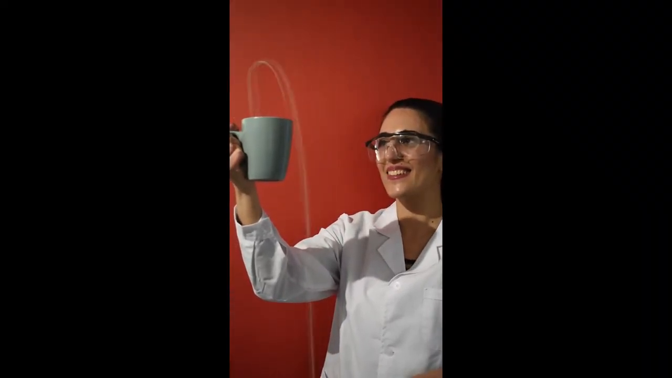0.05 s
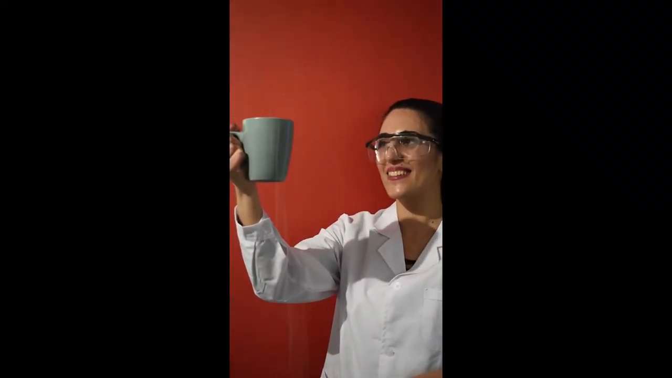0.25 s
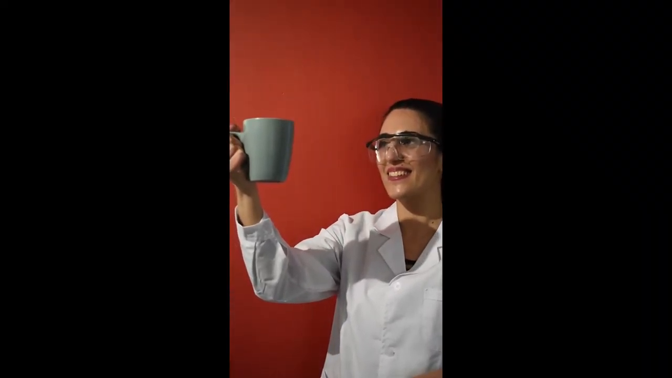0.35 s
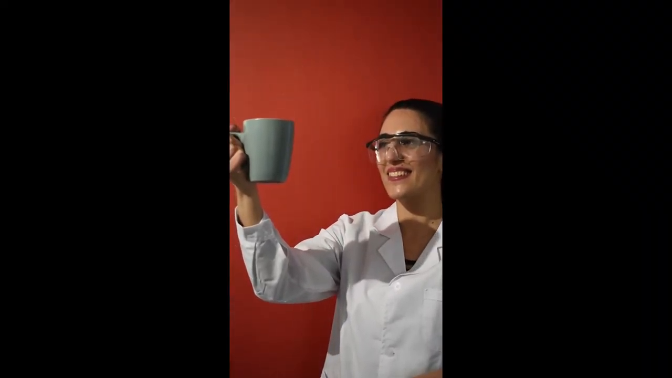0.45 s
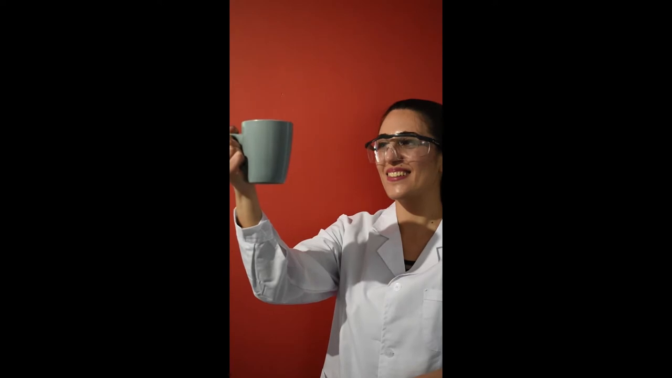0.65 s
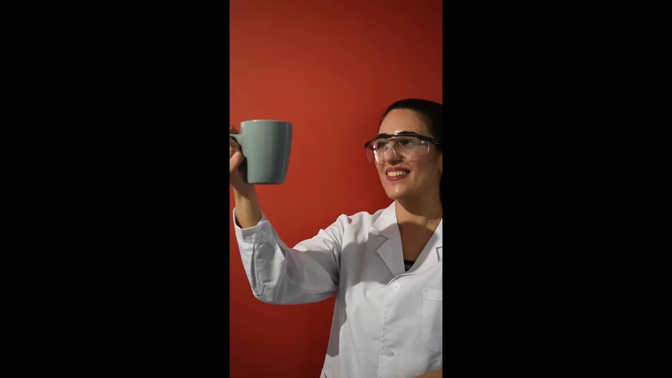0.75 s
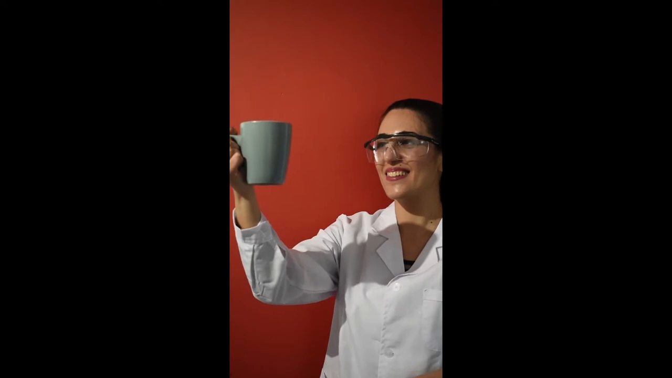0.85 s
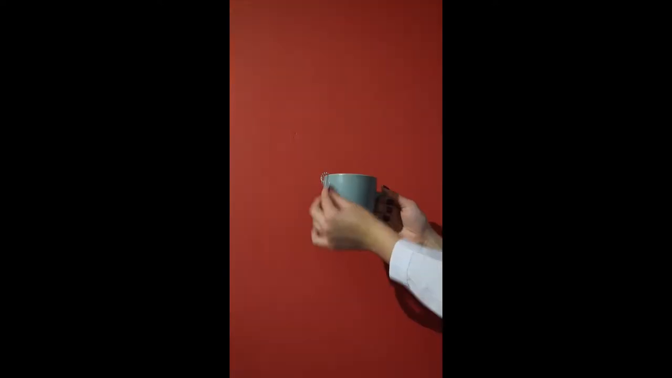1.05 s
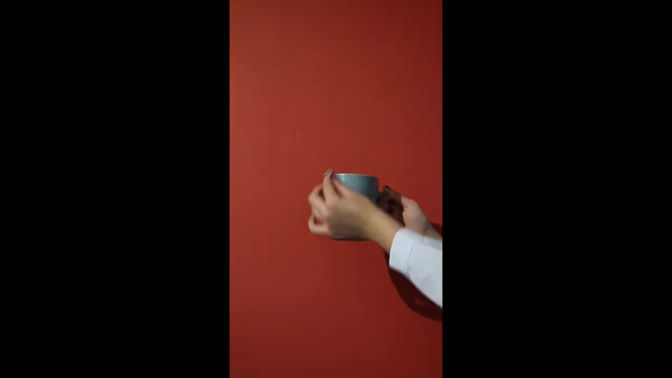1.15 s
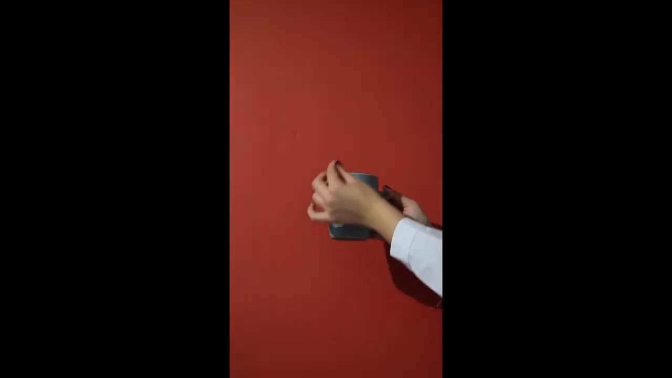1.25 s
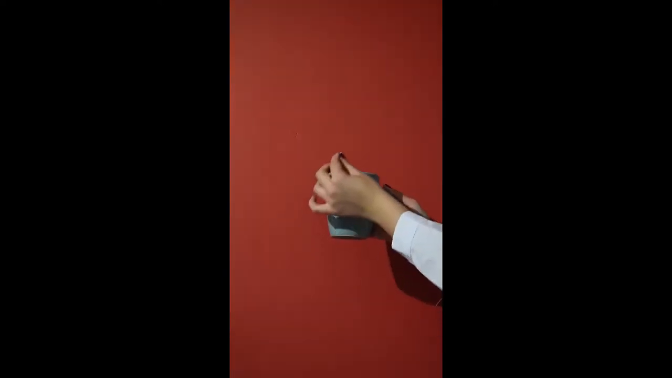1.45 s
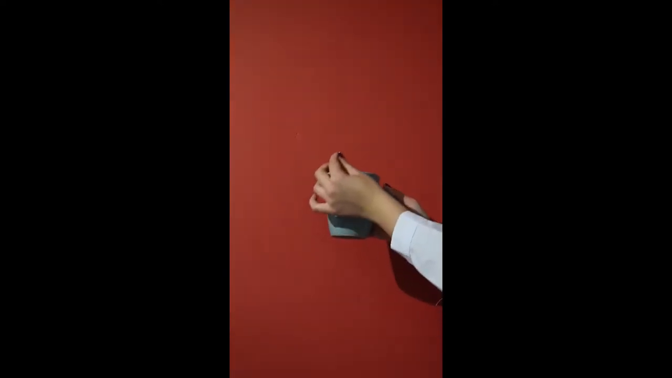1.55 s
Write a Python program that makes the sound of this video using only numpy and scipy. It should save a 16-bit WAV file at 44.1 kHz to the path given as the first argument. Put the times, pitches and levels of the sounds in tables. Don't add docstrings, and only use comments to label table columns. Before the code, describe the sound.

Metal bead chain rattles out of a ceramic mug, whips its wall, and thuds on hollow floor

```python
import sys
import numpy as np
from scipy import signal
from scipy.fft import rfft, irfft, next_fast_len
from scipy.io import wavfile
from scipy.ndimage import uniform_filter1d, map_coordinates

SR = 44100
rng = np.random.default_rng(int(sys.argv[2]) if len(sys.argv) > 2 else 0)


def decibels_to_gain(level_db):
    exponent = np.asarray(level_db, float) / 20
    return 10 ** exponent


def digitize_waveform(pressure):
    field = np.atleast_2d(pressure).T
    bounded = np.clip(field, -1, 1)
    quanta = np.round(bounded * 32767).astype(np.int16)
    wavfile.write(sys.argv[1], SR, quanta)


N = 70560
TIME = np.arange(N) / SR

BOARD_HZ = [150, 220, 345, 428, 550, 645, 790, 937, 1130, 1340, 1650, 2150, 2730]
# [width/Hz, level/dB, loudest at t/s]
BOARD = [(41, -20.5, 0.44), (25, -9, 0.515), (48.7, -3.5, 0.4284), (30, -1, 0.461), (40, -2, 0.423),
         (41, -7.5, 0.47), (80, -12, 0.48), (51.7, -4, 0.406), (120, -13, 0.438), (120, -12, 0.409),
         (199, -17, 0.468), (300, -23.5, 0.441), (122, -25, 0.429)]
BEADS_PER_S = 3000


def unit(x):
    return x / np.sqrt(np.mean(x ** 2) + 1e-20)


def along(points, hz):
    f, value = np.transpose(points)
    return np.interp(np.log(hz + 1), np.log(f + 1), value)


def level(rows):
    s, db = np.transpose(rows)
    return decibels_to_gain(np.interp(TIME, s, db, left=-200, right=-200))


def filtered(x, response):
    size = next_fast_len(len(x) + 8192)
    spectrum = rfft(x, size) * response(np.fft.rfftfreq(size, 1 / SR))
    return irfft(spectrum, size)[:len(x)]


def colour(points):
    return lambda hz: decibels_to_gain(along(points, hz))


def body(peaks):
    def response(f):
        total = 0
        for k, (centre, width, db) in enumerate(peaks):
            damping = 1j * f * width
            total = total + (-1) ** k * decibels_to_gain(db) * damping / (centre * centre - f * f + damping)
        return total
    return response


def low_cut(hz, order):
    return lambda f: (1j * f / (hz + 1j * f)) ** order


def contacts(per_s):
    chance, size, side = rng.random((3, N))
    scatter_db = 3
    strength = decibels_to_gain(-scatter_db * np.log(size + 0.0027))
    return (chance < per_s / SR) * strength * np.sign(side - .5)


def blows(rows):
    out = np.zeros(N)
    for s, db in rows:
        out[round(s * SR)] = decibels_to_gain(db)
    return out


def wobble(rate, n):
    knots = rng.standard_normal(int(n * rate / SR) + 4)
    return map_coordinates(knots, [np.arange(n) * rate / SR])


def stream():
    # [t/s, level/dB]
    flow = [(0.0, -50), (0.012, -45.5), (0.12, -47.5), (0.156, -47), (0.192, -48), (0.2, -51.5)]
    link_hz = [2420, 6220, 7160, 7770, 8940, 9230, 11000, 12740, 14300]
    # [width/Hz, level/dB, loudest at t/s]
    links = [(29.8, -7.5, 0.11), (35, -4, 0.071), (60, 0, 0.019), (40, -3, 0.1), (60, 2.5, 0.041),
             (37.5, -11, 0.095), (45.3, -9, 0.033), (25, 2.5, 0.13), (40, -18.5, 0.017)]
    # [f/Hz, level per Hz/dB]
    rattle_tone = [(150, -23), (250, -2.5), (414, 3), (955, -6.5), (1180, -31), (2440, -12), (2810, -9.5),
                   (12800, -4.5), (16000, -22)]
    swell_s, swell_db = 0.034, 7
    rattle_db, patter_db, patter_per_s = -3, -9, 780
    ring = 0
    for hz, (width, db, s) in zip(link_hz, links):
        swell = swell_db * np.exp(-((TIME - s) / swell_s) ** 2)
        tone = unit(filtered(contacts(BEADS_PER_S), body([(hz, width, 0)])))
        ring = ring + tone * decibels_to_gain(db - 11 + swell)
    rattle = unit(filtered(contacts(BEADS_PER_S * 4), colour(rattle_tone)))
    floor = body([(hz, width, db) for hz, (width, db, _) in zip(BOARD_HZ, BOARD)])
    patter = unit(filtered(contacts(patter_per_s), floor))
    return level(flow) * (ring + decibels_to_gain(rattle_db) * rattle + decibels_to_gain(patter_db) * patter)


def mug(taps, modes, modes_db, crack_db, crack_s):
    # [f/Hz, level/dB]
    crack_tone = [(300, -65), (700, -13.5), (2200, -8.5), (4000, -16), (7000, 0.5), (11000, -11),
                  (13000, -13), (16000, -37)]
    low_modes_hz, mode_scatter_db = 3000, 3
    rough_per_hz, rough_db, rise_s = .035, 5, .002
    out, t = np.zeros(N + SR), np.arange(SR // 3) / SR
    for s, db, low_db in taps:
        luck = rng.standard_normal((len(modes), 2))
        ring = 0
        for (hz, t60), mode_db, (a, b) in zip(modes, modes_db, luck):
            start_db = mode_db + low_db * (hz < low_modes_hz) + mode_scatter_db * a
            rough = rough_db * wobble(rough_per_hz * hz, len(t)) * hz / 6400.0
            drift = wobble(rough_per_hz * hz / 2, len(t)) * hz / 14000.0
            wave = np.sin(2 * np.pi * hz * t + 2 * b + drift)
            ring = ring + decibels_to_gain(start_db - 60 * t / t60 + rough) * wave
        crack = unit(filtered(rng.standard_normal(len(t)), colour(crack_tone)))
        crack = crack * decibels_to_gain(crack_db - 60 * t / crack_s)
        out[round(s * SR):][:len(t)] += decibels_to_gain(db - 10) * (ring * (1 - np.exp(-t / rise_s)) + crack)
    return out[:N]


def whipped_mug():
    # [t/s, level/dB, extra level of low tones/dB]
    whips = [
        (.2045, -26.5, -6.5),
        (.2105, -25, 9.5),
        (.2155, -22.5, 3),
        (.2225, -22, -16),
        (.229, -26.5, 3),
        (.242, -27, -3),
        (.2525, -42, 1),
        (.27, -55, 0),
        (.293, -41.5, 13.5),
        (.33, -45, 1),
    ]
    # [f/Hz, time to fade by 60 dB/s]
    wall = [(630, .1), (790, .2), (860, .12), (2376, .14), (2417, .22), (5700, .13), (6480, .11),
            (6680, .13), (6770, .2), (7208, .12), (8807, .12), (9250, .13), (10930, .09), (14320, .12)]
    wall_db = [-16, -13, -19.5, 0.5, -2, -6, -0.5, 0, -5, -22, -8.5, -7.5, -6.5, -25]
    return mug(whips, wall, wall_db, crack_db=5, crack_s=0.056)


def heap():
    # [t/s, level/dB]
    landing = [(.4015, -66), (.403, -27.5), (.414, -18.5), (.435, -18), (.45, -14), (.49, -19), (.51, -25),
               (.53, -33.5), (.56, -91)]
    # [t/s, level/dB]
    first = [(.4023, -23), (.408, -22), (.4125, -21), (.444, -20), (.452, -20)]
    # [t/s, level/dB]
    bounce = [(.664, -52), (.671, -38), (.69, -38.5), (.696, -43), (.706, -43), (.723, -46), (.737, -50),
              (.755, -67), (.767, -53.5)]
    # [t/s, level/dB]
    scatter = [(.402, -41.5), (.43, -47), (.44, -67)]
    # [t/s, level/dB]
    settle = [(.44, -79), (.465, -48), (.482, -36.5), (.5, -42.5), (.53, -54.5), (.58, -64)]
    # [f/Hz, level per Hz/dB]
    bare_tone = [(1470, -31), (2500, -8), (4240, -10.5), (4510, -8), (7830, -9.5), (16000, -56)]
    # [f/Hz, level per Hz/dB]
    bead_tone = [(1470, 8), (2500, 3.5), (4760, -28.5), (5390, -4.5), (8140, -1), (16000, -25.5)]
    spread_s, spread_db = .03, 5
    bright_db_per_s, bounce_hz, click_db = -120, 670, -22

    force = level(landing) * unit(contacts(2500)) + decibels_to_gain(21.5) * blows(first)
    drum = 0
    for k, (hz, (width, db, s)) in enumerate(zip(BOARD_HZ, BOARD)):
        swell = decibels_to_gain(spread_db * np.exp(-((TIME - s) / spread_s) ** 2))
        drum = drum + (-1) ** k * filtered(force * swell, body([(hz, width, db)]))
    dull = filtered(drum, lambda f: 1 / (1 + 1j * f / 800) ** 2)
    bright = np.minimum(1, decibels_to_gain(bright_db_per_s * (TIME - landing[0][0])))
    drum = dull + bright * (drum - dull)

    def end_response(f):
        knock = body([(470, 200, 0), (340, 60, -4)])(f) * body([(480, 500, 0)])(f)
        return knock / (1 + 1j * f / bounce_hz) ** 2

    end = filtered(blows(bounce), end_response)
    spray = 0
    for rows, tone in [(scatter, bare_tone), (settle, bead_tone)]:
        spray = spray + level(rows) * unit(filtered(contacts(BEADS_PER_S * 4), colour(tone)))
    click = decibels_to_gain(click_db) * filtered(blows(first), body([(5000, 3700, 0.007)]))
    thud = filtered(decibels_to_gain(19.5) * drum + decibels_to_gain(48.5) * end, low_cut(120, 4))
    return thud + filtered(spray + click, low_cut(1500, 2))


def stirred_mug():
    # [t/s, level/dB, extra level of low tones/dB]
    stirs = [
        (1.092, -52, -8),
        (1.1165, -52, 1),
        (1.145, -47, -8),
        (1.16, -46, 3.5),
        (1.166, -47, 12),
        (1.18, -37, -7),
        (1.198, -56, -2),
        (1.5918, -37.5, -7),
        (1.5935, -36, 3),
    ]
    # [f/Hz, time to fade by 60 dB/s]
    wall = [(2290, .09), (2335, .07), (5722, .06), (6760, .06), (6842, .16), (7400, .04), (7908, .04),
            (11100, .06)]
    wall_db = [0, -6, -1, -9, -8, -9, -11, -13]
    return mug(stirs, wall, wall_db, crack_db=-3, crack_s=.02)


def room(x):
    # [f/Hz, time to fade by 60 dB/s]
    fading = [(200, 0.36), (1000, 0.38), (4000, 0.53), (12000, 0.27)]
    hz, t, z = signal.stft(rng.standard_normal(SR // 2), SR, nperseg=256)
    decay = decibels_to_gain(-60 * t / along(fading, hz)[:, None])
    tail = signal.istft(z * decay, SR, nperseg=256)[1]
    return signal.fftconvolve(np.pad(x, (250, 0)), tail / np.linalg.norm(tail))[:N]


def hiss():
    # [f/Hz, level per Hz/dB]
    hiss_tone = [(15, -50), (40, -14.5), (100, -3.5), (160, -5.5), (260, -5), (700, -9), (4400, -22),
                 (13800, -34), (16400, -53)]
    return decibels_to_gain(-57.5) * unit(filtered(rng.standard_normal(N), colour(hiss_tone)))


def scene():
    bright = stream() + whipped_mug() + stirred_mug()
    thud = heap()
    echo = decibels_to_gain(-11) * room(bright) + decibels_to_gain(-11.5) * room(thud)
    return (bright + thud + echo + hiss())[None]


def starve(x):
    # [middle t/s, length/s]
    moments = [(.0545, .01), (.12, .012), (.163, .01), (.4505, .024), (.548, .008)]
    kept_db = [-10, -10, -10, -38, -18]
    loss_db = [-20, -13, -16, -60, -22]
    soft_db, edge_s = 2, .005
    hz, t, z = signal.stft(x, SR, nperseg=384, noverlap=320)
    power = uniform_filter1d(np.abs(z) ** 2, size=3, axis=0)
    power = uniform_filter1d(power, size=7, axis=1)
    band_db = 10 * np.log10(np.abs(power) + 1e-18)
    under = band_db - band_db.max(0)
    cut_db = 0
    for (s, span), keep_db, db in zip(moments, kept_db, loss_db):
        gate = np.clip((span / 2 - np.abs(t - s)) / edge_s + .5, 0, 1)
        weak = 1 / (1 + np.exp(np.clip((under - keep_db) / soft_db, -30, 30)))
        cut_db = cut_db + db * gate * weak
    return signal.istft(z * decibels_to_gain(cut_db), SR, nperseg=384, noverlap=320)[1][:N]


def top_cut(x):
    return signal.sosfilt(signal.butter(12, 16510, fs=SR, output="sos"), x)


def record(dry):
    dip_s, gap_s, fade_s = .9475, 0.0021, 0.031
    fade = np.clip((np.abs(TIME - dip_s) - gap_s) / fade_s, 0, 1) ** 1.86
    return top_cut((starve(dry[0]) * fade)[None])


dry = scene()
out = record(dry)
digitize_waveform(out)
```